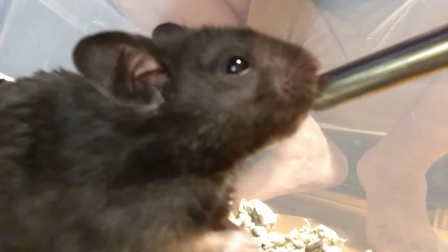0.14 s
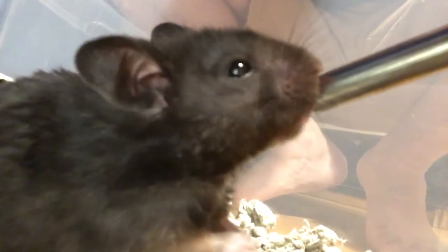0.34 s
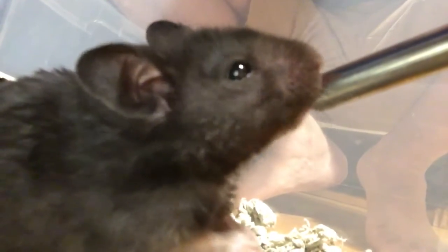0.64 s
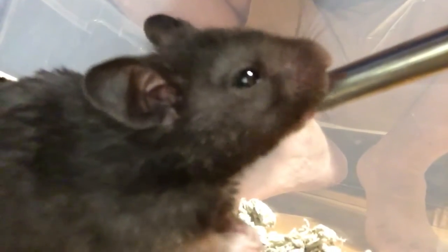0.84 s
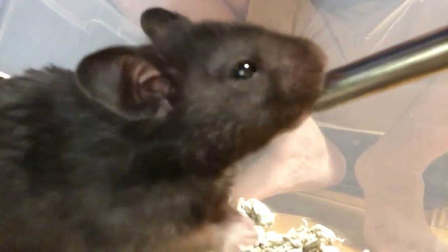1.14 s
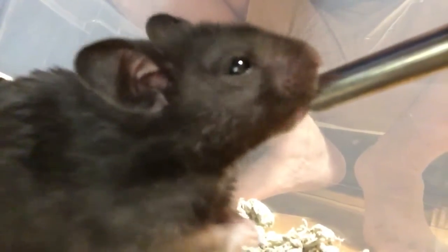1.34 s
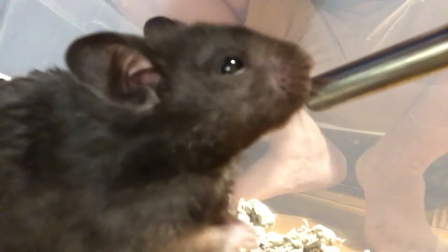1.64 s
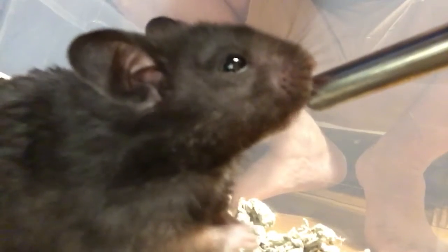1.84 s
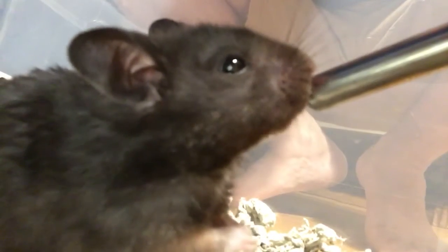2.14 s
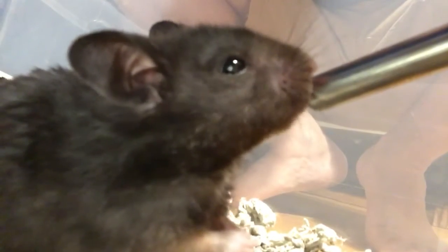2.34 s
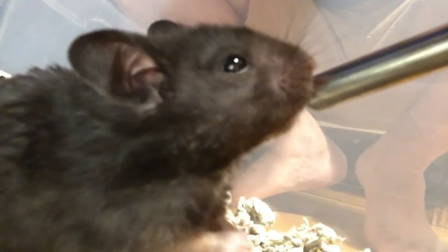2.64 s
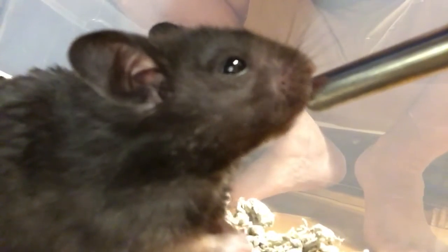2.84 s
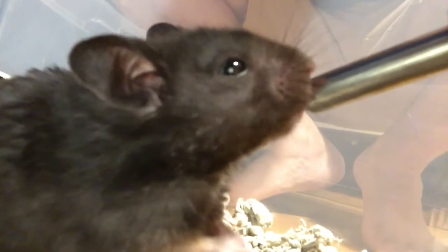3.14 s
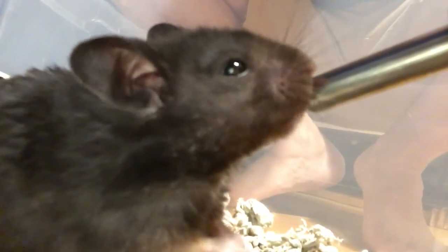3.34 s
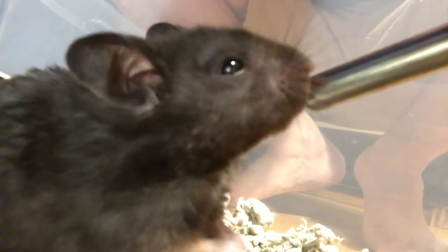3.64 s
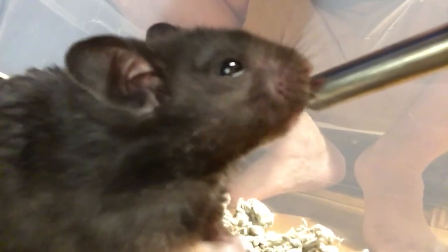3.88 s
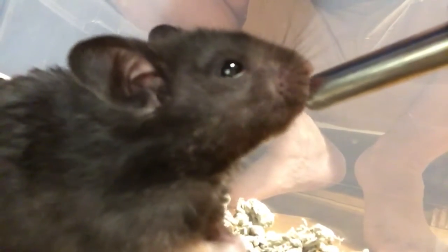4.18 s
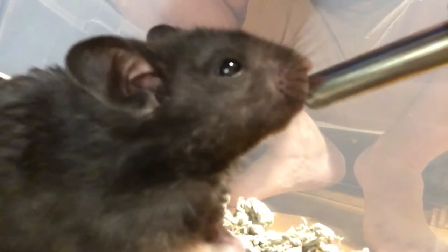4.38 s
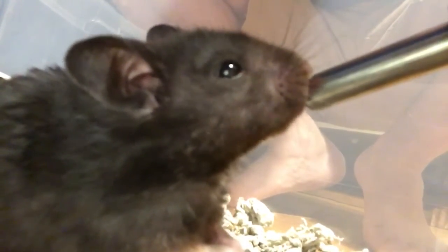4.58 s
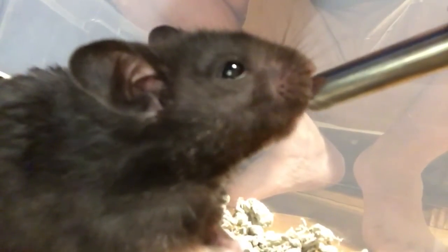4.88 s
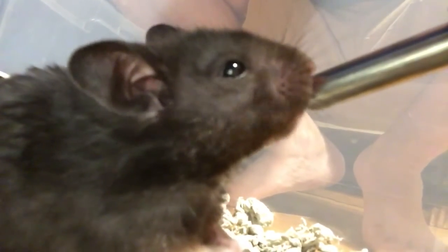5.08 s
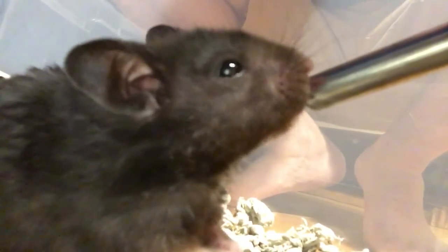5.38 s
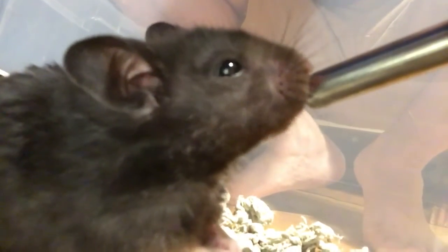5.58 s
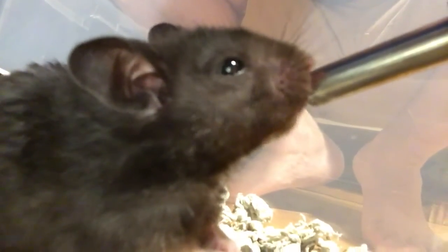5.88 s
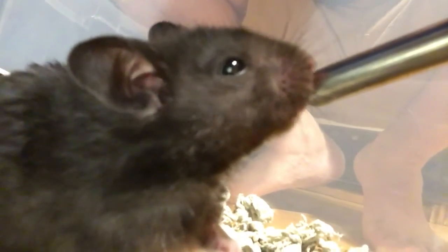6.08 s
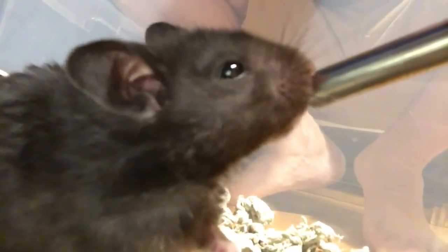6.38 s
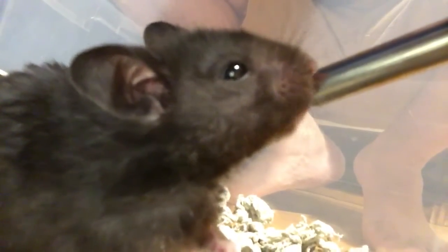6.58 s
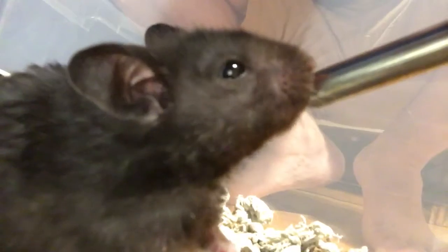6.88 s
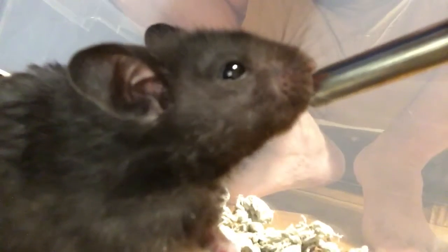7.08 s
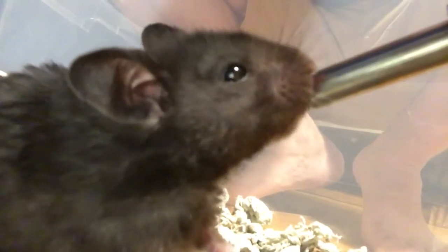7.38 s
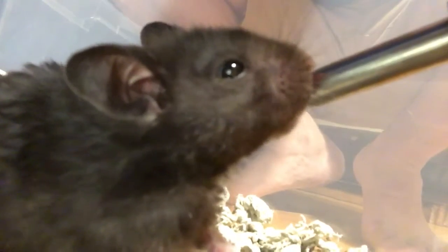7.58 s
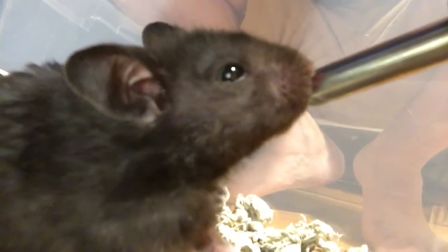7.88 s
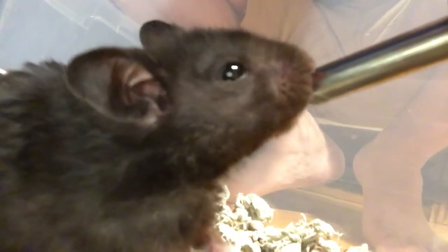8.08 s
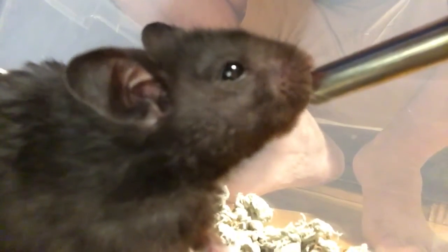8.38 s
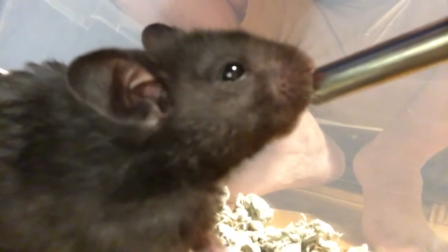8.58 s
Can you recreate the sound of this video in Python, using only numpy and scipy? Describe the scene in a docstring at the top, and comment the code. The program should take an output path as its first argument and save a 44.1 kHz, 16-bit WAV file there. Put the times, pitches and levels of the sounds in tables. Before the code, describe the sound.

Small, dry metallic clicks come from a valve ball being licked in a drinking tube, each with a short gritty rattle. Wet tongue and jaw clicks fill in between. Hollow plastic knocks jump out now and then, loudest near the start, the middle and late on. The sound is intimate, in a small plastic enclosure, with a quiet indoor hum and almost inaudible ticking behind.

```python
"""Small rodent drinking from a bottle spout

A small rodent drinks from the steel spout of a water bottle in a plastic cage, close to one microphone.
About five licks a second rattle the valve ball: decaying steel modes, noisy chatter and a gritty slide.
Hollow knocks and light taps run through resonant plastic, with their treble arriving first.
Filtered noise makes the moist tongue, rubbing fur, shuffling paws and room murmur; sines make the bubbles.
Tongue and jaw click softly, teeth tick on the rim, and a very faint ticking lies behind."""
import sys
import numpy as np
from scipy import signal
from scipy.fft import rfft, irfft
from scipy.io import wavfile
from scipy.ndimage import uniform_filter1d

SR = 44100
rng = np.random.default_rng(int(sys.argv[2]) if len(sys.argv) > 2 else 0)


def waveform_to_disk(signal):
    """Save audio, clipped to [-1, 1], as 16-bit WAV at the path in sys.argv[1]."""
    frames = np.transpose(np.atleast_2d(signal))
    scaled = np.clip(frames, -1, 1) * 32767
    samples = np.round(scaled).astype(np.int16)
    wavfile.write(sys.argv[1], SR, samples)


N = 384552
SIZE = 4096  # length of one event [samples]
AGE = np.arange(SIZE) / SR  # time since the start of an event [s]
HZ = np.fft.rfftfreq(SIZE, 1 / SR) + 1  # event spectrum, shifted 1 Hz to stay clear of zero

# modes of the steel spout, before scatter: (frequency [Hz], level [dB], t60 [s])
SPOUT_MODES = [(1101, -9, 0.031), (1442, -17, 0.068), (1806, -24, 0.062), (2400, -6.5, 0.035),
               (2486, -3, 0.026), (2730, -8, 0.035), (2811, -3.5, 0.044), (3320, -23, 0.037),
               (3570, -25.5, 0.047), (3820, -15.5, 0.025), (5220, -13, 0.044), (5350, -10, 0.044),
               (5472, -2, 0.02), (5750, -14.5, 0.044), (6440, -19, 0.039), (7010, -10, 0.025),
               (7580, -13.5, 0.031), (8210, -6.5, 0.015), (8530, 2.5, 0.0056), (8950, -3.5, 0.013),
               (9650, -4, 0.014), (10100, -13.5, 0.026), (11300, -15, 0.013), (11950, -6.5, 0.0042),
               (11700, -45, 0.011), (14000, -27, .01), (14900, -5, 0.0055)]
# resonances of the plastic: (frequency [Hz], half-width at -6 dB [Hz], level [dB])
PLASTIC_MODES = [(194, 84, -14), (387, 50, -19.5), (566.4, 67, 2.5), (736, 115, -0.5), (1030, 150, -8.5),
                 (1397, 103, -11.5), (1920, 285, -18.5), (2400, 217, -21), (2730, 120, -17),
                 (3480, 270, -25), (4260, 390, -32.5), (5700, 400, -44), (7130, 620, -40.5)]
# how busy the mouth is, before the trim of each layer: (time [s], level [dB])
MOUTH_ACTIVITY = [(0.0, -64), (0.24, -69), (0.77, -60), (0.97, -66.5), (1.48, -71.5), (2.38, -67),
                  (2.69, -59), (3.06, -66), (3.74, -61.5), (4.27, -68), (4.78, -60), (5.34, -65),
                  (6.61, -66.5), (7.02, -58.5), (7.72, -69), (8.13, -63.5), (8.4, -69), (8.72, -62)]
# each lick lifts the valve ball and lets it drop back, levels before the trim of each layer:
# (time [s], lift level [dB], time aloft [s], drop level [dB], extra ring of the low tube modes [dB])
LICK_EVENTS = [(0.1833, -45, 0.016, -54, 8.5), (0.3756, -40.5, 0.036, -47.5, 6),
               (0.575, -45.5, 0.012, -51.5, 7.5), (0.636, -53, 0.012, -64, 7.5),
               (0.7378, -52, .032, -51.5, 9.5), (0.7826, -50, 0.019, -41, 4.5),
               (0.829, -54.5, .04, -51, 4.5), (0.9164, -42.5, .0053, -42, 1),
               (0.9381, -40, 0.0044, -50, 5.5), (1.036, -54, 0.0045, -40.5, -9),
               (1.089, -55.5, 0.01, -56.5, 7), (1.3262, -51.5, 0.045, -58.5, 8), (1.5533, -66, .01, -76, 4),
               (1.723, -65, 0.014, -55.5, 7.5), (2.088, -53.5, .0085, -49.5, 6.5),
               (2.2743, -65.5, .01, -72, 3), (2.4514, -58.5, 0.01, -50, 8), (2.8039, -57.5, .01, -58.5, 3),
               (3.0164, -55, 0.011, -69, 5.5), (3.1926, -62, 0.0083, -55, 8.5),
               (3.366, -53.5, 0.0098, -51.5, 6.5), (3.549, -65, .01, -72, 3), (3.94, -59, 0.0091, -77, 12),
               (4.1126, -53, 0.02, -51, 5), (4.3141, -53, 0.0076, -60, 6.5), (4.492, -62.5, .01, -70, 5),
               (4.8897, -52, 0.026, -55, 7), (5.0785, -53, 0.016, -50, 5), (5.2672, -61, 0.008, -50, 9),
               (5.4507, -58, 0.0047, -58.5, 6), (5.8544, -55, 0.035, -47, 6.5),
               (6.0497, -53.5, .0076, -48.5, 3.5), (6.2388, -57.5, 0.0087, -78, 7.5),
               (6.448, -55.5, 0.019, -54, 6.5), (6.627, -52.5, 0.016, -53, 6), (6.69, -44.5, 0.044, -59, 7),
               (6.8363, -53, 0.014, -50.5, 6.5), (7.0256, -50.5, 0.0095, -53.5, 3.5),
               (7.0594, -52, .0057, -50, 8.5), (7.211, -56, 0.014, -58.5, 0),
               (7.2704, -48, 0.041, -60, 1.5), (7.4055, -61, 0.033, -48, 6),
               (7.7964, -66, 0.023, -46.5, 7.5), (7.9817, -57.5, .0169, -51.5, 7.5),
               (8.17, -55.5, 0.023, -44.5, 7.5), (8.24, -54, .01, -74, 6), (8.3585, -66.5, .01, -73, 8)]


def undb(db):
    """Decibels to gain."""
    return np.exp(np.asarray(db) * (np.log(10) / 20))


def unit(x):
    """Scale to an rms of one."""
    return x / np.sqrt(np.mean(x ** 2))


def blow(x):
    """Scale a hit so that its energy equals an rms of one over 5 ms."""
    return x / np.sqrt(np.sum(x ** 2) / (.005 * SR))


def fade(t60):
    """Exponential decay over one event, falling 60 dB in t60 seconds."""
    return undb(-60 * AGE / t60)


def colour(points, hz):
    """Gain of a (frequency [Hz], level [dB]) spectrum, interpolated over log frequency."""
    f, db = np.transpose(points)
    return undb(np.interp(np.log(hz + 1), np.log(f), db))


def shaped(x, points):
    """Give a full-length signal a spectrum."""
    return irfft(rfft(x) * colour(points, np.fft.rfftfreq(N, 1 / SR)), N)


def resonances(modes, hz):
    """Gain of overlapping (frequency [Hz], half-width [Hz], level [dB]) resonances."""
    power = 0
    for centre, width_hz, db in modes:
        power = power + undb(db) ** 2 / (1 + ((hz - centre) / width_hz) ** 2) ** 2
    return np.sqrt(power)


def causal(gain):
    """Minimum phase: the quickest response that has this gain, from the folded cepstrum."""
    cepstrum = irfft(np.log(gain))
    cepstrum[1:SIZE // 2] *= 2
    cepstrum[SIZE // 2 + 1:] = 0
    return np.exp(rfft(cepstrum))


def curve(rows):
    """A (time [s], level [dB]) table as a gain for each sample, -120 dB outside."""
    s, db = np.transpose(rows)
    return undb(np.interp(np.arange(N) / SR, s, db, left=-120, right=-120))


def swells(rows, attack_s, t60):
    """Sum of (time [s], length [s], level [dB]) swells that rise before their time, hold and die away."""
    t = np.arange(N) / SR
    gain = np.zeros(N)
    for s, length, db in rows:
        rise = np.clip((t - s) / attack_s + 1, 0, 1) ** 2
        decay = np.exp(-np.log(1000) * np.maximum(t - s - length, 0) / t60)
        gain += undb(db) * rise * decay
    return gain


def walk(rate):
    """Smoothed random drift with an rms of one and about rate fresh values a second."""
    k = int(SR / rate)
    held = np.repeat(rng.standard_normal(N // k + 1), k)
    return unit(uniform_filter1d(held, k)[:N])


def grit(spread_db):
    """Dense tiny contacts of very uneven size: noise with a fast random level."""
    return unit(rng.standard_normal(N) * undb(spread_db * walk(900)))


def add(track, s, x):
    """Mix a sound in at a time."""
    i = max(int(s * SR), 0)
    track[i:i + len(x)] += x[:max(N - i, 0)]


def ring(modes, scatter_db, detune):
    """Decaying sine modes; every contact point weights and tunes them a little differently."""
    hz, db, t60 = np.transpose(modes)[:, :, None]
    size, pitch, sign = rng.standard_normal((3, len(modes), 1))
    gain = np.sign(sign) * undb(db + scatter_db * size)
    tone = np.sin(2 * np.pi * hz * (1 + detune * pitch) * AGE)
    return np.sum(gain * fade(t60) * tone, axis=0)


def reflect(x, wet_db, t60, dull_hz, gap_s):
    """Add dense, dulled reflections: low-passed decaying noise that starts after a short gap."""
    tail = rng.standard_normal(SIZE) * fade(t60) * (AGE > gap_s)
    tail = irfft(rfft(tail / np.sqrt(np.sum(tail ** 2))) / (1 + 1j * HZ / dull_hz))
    return x + undb(wet_db) * signal.fftconvolve(x, tail)[:N]


def room(level_db=-54.5):
    """A nearly steady murmur of noise that rings the air in the cage."""
    # the room as heard inside the cage: (frequency [Hz], level [dB])
    room_colour = [(22, -33), (50, -2.5), (90, -8.5), (130, -6), (290, -14.5), (1100, -26), (1800, -28),
                   (3000, -35), (4000, -34), (4850, -39), (5400, -34.5), (7000, -37.5), (8200, -43),
                   (15500, -50)]
    # room and cage-air resonances: (frequency [Hz], half-width at -6 dB [Hz], level [dB])
    air_modes = [(56.8, 9.7, 3.5), (125, 31, -8.5), (247, 16, -14), (381, 39.4, -5.5), (528, 25, -2.5),
                 (587, 32, -3), (706, 98, -10), (2380, 105, -24.5), (2855, 103, -23.5)]
    hz = np.fft.rfftfreq(N, 1 / SR)
    gain = np.hypot(colour(room_colour, hz), resonances(air_modes, hz))
    murmur = unit(irfft(rfft(rng.standard_normal(N)) * gain, N))
    return murmur * undb(level_db + 0.75 * walk(6.6))


def ticking(level_db=-74, rate_hz=20.2, uneven_s=.004, t60=0.0084):
    """Very faint, nearly regular ticks of treble noise in the background."""
    # colour of the ticks: (frequency [Hz], level [dB])
    tick_colour = [(1500, -12), (3000, 6.5), (4800, -18), (6600, -3.5), (7200, -10), (8500, -20)]
    out = np.zeros(N)
    for s in np.arange(0, N / SR, 1 / rate_hz):
        late, size = rng.standard_normal(2)
        strength = undb(4 * np.tanh(size))
        add(out, s + uneven_s * late, strength * rng.standard_normal(SIZE) * fade(t60))
    return unit(shaped(out, tick_colour)) * undb(level_db)


def shuffle():
    """Soft, uneven thumps of paws on the bedding: low noise with a fluttering level."""
    # colour of the bedding: (frequency [Hz], level [dB])
    bedding_colour = [(25, -34), (55, 5.5), (100, 0.5), (200, -4.5), (350, -11), (700, -19), (1500, -20.5),
                      (4000, -39), (12000, -74)]
    # the animal shifts its weight: (time [s], length [s], level [dB])
    step_rows = [(.37, .04, -49.5), (.65, 0.025, -53.5), (.765, 0.038, -45), (.9, 0.056, -42.5),
                 (1.02, 0.19, -49.5), (1.31, 0.052, -48), (5.865, 0.044, -48), (6.185, 0.032, -46.5)]
    paws = unit(shaped(rng.standard_normal(N) * undb(2 * walk(90)), bedding_colour))
    return paws * swells(step_rows, attack_s=0.024, t60=0.23)


def tongue(level_db=-2.0):
    """A fine, moist crackle of uneven noise while the mouth works."""
    # colour of the wet tongue: (frequency [Hz], level [dB])
    wet_colour = [(200, -47), (700, 10.5), (1300, 8.5), (1900, -4), (3200, -0.5), (4500, -20), (6000, -44),
                  (12000, -40)]
    crackle = grit(spread_db=6) * undb(4 * walk(70))
    return unit(shaped(crackle, wet_colour)) * curve(MOUTH_ACTIVITY) * undb(level_db)


def knock(bright_db, pitch, soft_hz, lag_s=0.001198, bright_hz=1400, echo_s=0.00466, echo_db=-22):
    """A bending wave in thin plastic: the treble arrives first, the lows follow, the far edge echoes it."""
    body = resonances(PLASTIC_MODES, HZ / pitch)
    treble = undb(bright_db * (1 - 1 / (1 + (HZ / bright_hz) ** 4)))
    contact = treble / (1 + (HZ / soft_hz) ** 6)
    # travel time falls with the root of frequency; lag_s holds at 1 kHz
    travel = np.exp(-4j * np.pi * lag_s * np.sqrt(1000 * HZ))
    echo = 1 + undb(echo_db) * np.exp(-2j * np.pi * HZ * echo_s) / (1 + (HZ / 2500) ** 2)
    scale = np.sqrt(np.sum(irfft(body) ** 2) / (.005 * SR))
    return -irfft(causal(body * contact) * travel * echo) / scale


def smacks(count=300, level_db=6, spread_db=4, soft_hz=2800):
    """Many faint wet clicks of tongue and jaw at random times, coloured by the plastic of the cage."""
    out = np.zeros(N)
    for when, size, bright, pitch in rng.uniform(-1, 1, (count, 4)):
        click = knock(2 + 5 * bright, np.exp(0.059 + .35 * pitch), soft_hz)
        add(out, (when + 1) / 2 * N / SR, undb(spread_db * size) * click)
    clicks = out * curve(MOUTH_ACTIVITY) * undb(level_db)
    return reflect(clicks, wet_db=-2.5, t60=0.016, dull_hz=5030, gap_s=0.0028)


def nudges(count=44, level_db=14, spread_db=4, bright_db=1, soft_hz=3500):
    """About once a lick the bottle taps lightly in its holder, harder when the mouth is busy."""
    out = np.zeros(N)
    for k, (when, size, bright, pitch) in enumerate(rng.uniform(-1, 1, (count, 4))):
        tap = knock(bright_db + 9 * bright, np.exp(.12 * pitch), soft_hz)
        # one tap falls at random in each of the equal slots
        add(out, (k + (when + 1) / 2) / count * N / SR, undb(spread_db * size) * tap)
    taps = out * curve(MOUTH_ACTIVITY) * undb(level_db)
    return reflect(taps, wet_db=-3, t60=0.035, dull_hz=5000, gap_s=.003)


def knocks(lead_s=.0006, soft_hz=8800, softening=0.28, stutter_db=-44):
    """Hollow plastic knocks as the bottle is nudged and settles."""
    # knocks of bottle and cage wall: (time [s], level [dB], treble lift [dB], pitch relative to 555 Hz [Hz])
    knock_rows = [(0.1183, -43, -2, 570), (0.4747, -30, -4.5, 518), (0.5037, -44.5, 9, 560),
                  (0.5272, -49, 18, 646), (0.8473, -17.5, -1, 558), (1.1831, -20, 0, 553),
                  (1.9198, -38, 3, 537), (2.587, -19.5, 3.5, 551), (2.743, -47, 11, 610),
                  (2.7786, -26, 1, 550), (2.844, -25, 1.5, 563), (2.8858, -38.5, 1.5, 600),
                  (2.9366, -39, -11, 537), (3.2315, -48.5, 10, 610), (3.5315, -46.5, 10, 533),
                  (3.6941, -41.5, 3, 620), (3.7751, -41, -1, 545), (3.9272, -44, 9, 483),
                  (3.9487, -41, 0, 493), (4.296, -47, 6, 517), (4.4461, -42.5, -18, 517),
                  (4.5452, -45.5, 3, 604), (4.6607, -42, -2, 516), (4.809, -20.5, -3.5, 559),
                  (4.8576, -44, 3, 570), (4.9874, -42.5, -16, 593), (5.1296, -39, 2, 576),
                  (5.1406, -19.5, -5, 555), (5.25, -47.5, 6, 640), (5.6371, -42, -7, 570),
                  (5.8319, -40.5, -9, 560), (5.8723, -39, -7, 535), (5.9099, -37.5, -1, 555),
                  (6.188, -36, -3, 480), (6.2072, -39, 3, 560), (6.604, -44, 2, 556),
                  (7.0845, -18.5, -5, 548), (7.1447, -35.5, 2.5, 610), (7.676, -47, 6, 640),
                  (7.9494, -43, -17, 497), (8.2774, -47.5, 6, 608)]
    out = np.zeros(N)
    loudest = max(row[1] for row in knock_rows)
    for (s, db, bright_db, hz), wait in zip(knock_rows, rng.random(len(knock_rows))):
        # gentle contacts last longer and so lose their top
        top_hz = soft_hz * undb(softening * (db - loudest))
        hit = knock(bright_db, hz / 555, top_hz)
        add(out, s - lead_s, undb(db) * hit)
        # a faint second touch follows within a few milliseconds
        add(out, s + 0.001985 + 0.00598 * wait, undb(min(db - 8.5, stutter_db)) * hit)
    return reflect(out, wet_db=-17.5, t60=0.082, dull_hz=5000, gap_s=0.0031)


def rub(plastic_db=-1, crackle_db=-12):
    """Fur and teeth drag over the tube: gritty noise stirs both the steel and the bottle."""
    # colour of the soft rubbing force: (frequency [Hz], level [dB])
    fur_colour = [(200, -21), (2000, 11), (6000, -1.5), (9000, -8), (15000, -12)]
    # the snout rubs along the spout: (time [s], length [s], level [dB])
    rub_rows = [(.775, 0.036, -45), (.915, 0.03, -44), (1.035, 0.014, -63)]
    steel = blow(ring(SPOUT_MODES, scatter_db=8, detune=0.0028))
    plastic = blow(irfft(causal(resonances(PLASTIC_MODES, HZ)) * 1j * HZ))
    body = steel + undb(plastic_db) * plastic
    force = shaped(grit(spread_db=10.5), fur_colour)
    drag = unit(signal.fftconvolve(force, body)[:N])
    drag = drag + undb(crackle_db) * grit(spread_db=18)
    return drag * swells(rub_rows, attack_s=0.0078, t60=0.24)


def teeth(scrape_db=-2, scrape_t60=0.015):
    """Hard, thin ticks on the rim: short high modes and a scrape of noise."""
    # teeth touch the rim of the tube: (time [s], level [dB])
    tooth_rows = [(0.774, -42), (0.782, -45), (0.8877, -44), (0.8926, -58), (1.2771, -59)]
    # modes of the rim, before scatter: (frequency [Hz], level [dB], t60 [s])
    rim_modes = [(4070, 9, 0.012), (4180, 8, 0.0098), (4570, 3, 0.0085), (6440, 3, 0.008), (9700, -9, .008),
                 (11300, 0, 0.0074), (13100, -11, .008), (14700, -16, .008)]
    out = np.zeros(N)
    for s, db in tooth_rows:
        scrape = blow(rng.standard_normal(SIZE) * fade(scrape_t60))
        rim = blow(ring(rim_modes, scatter_db=2.5, detune=.02))
        add(out, s, undb(db) * (rim + undb(scrape_db) * scrape))
    return reflect(out, wet_db=-6, t60=.035, dull_hz=6000, gap_s=0.0022)


def bubbles(t60=0.005, glide=0.13):
    """Small air bubbles in the spout ring briefly, rising in pitch as they reach the surface."""
    # bubbles: (time [s], level [dB], starting pitch [Hz])
    bubble_rows = [(1.3183, -39.5, 2300), (3.6935, -47.5, 3270), (4.689, -60, 3280), (7.7335, -56.5, 3360),
                   (8.6958, -57.5, 3170)]
    out = np.zeros(N)
    for s, db, start_hz in bubble_rows:
        hz = start_hz * (1 + glide * np.minimum(AGE / t60, 1))
        phase = 2 * np.pi * np.cumsum(hz) / SR
        add(out, s, undb(db) * blow(np.sin(phase) * fade(t60)))
    return reflect(out, wet_db=-9, t60=0.024, dull_hz=6000, gap_s=0.002)


def slide(slide_db=-14, plastic_db=-3, soft_hz=7000):
    """The tongue drags the ball round its seat: a gritty ring swells, following each lick's harder strike."""
    rolls = []
    for s, lift_db, aloft_s, drop_db, ring_db in LICK_EVENTS:
        rolls.append((s, aloft_s, max(lift_db, drop_db) + slide_db))
    steel = rfft(ring(SPOUT_MODES, scatter_db=3, detune=.002))
    steel = blow(irfft(steel / (1 + (HZ / soft_hz) ** 4)))
    tilt = (1j * HZ) ** 2 / (1 + 1j * HZ / 3000) ** 2  # thins the lows
    plastic = blow(irfft(causal(resonances(PLASTIC_MODES, HZ)) * tilt))
    drag = unit(signal.fftconvolve(grit(spread_db=8), steel + undb(plastic_db) * plastic)[:N])
    return drag * swells(rolls, attack_s=0.015, t60=0.07)


def strikes(bounce_s=.006, bounce_db=-11.5):
    """Lift and drop of each lick, each with one rebound: (time [s], level [dB], ring [dB])."""
    out = []
    all_waits = .5 + rng.random((len(LICK_EVENTS), 2))
    for (s, lift_db, aloft_s, drop_db, ring_db), waits in zip(LICK_EVENTS, all_waits):
        for when, db, wait in zip((s, s + aloft_s), (lift_db, drop_db), waits):
            out.append((when, db, ring_db))
            out.append((when + bounce_s * wait, db + bounce_db, ring_db))
    return out


def contacts(lead_s, count=4, graze_db=-11, within_s=0.02, soft_hz=7000, chatter_db=-9, chatter_t60=0.01):
    """Force on the tube, as a spectrum: one strike, soft wet grazes around it, and a dying chatter."""
    when, size = rng.random((2, count, 1))
    delays = np.exp(-2j * np.pi * HZ * within_s * when ** 2)
    grazes = np.sum(undb(graze_db - 10 * size) * delays, axis=0) / (1 + 1j * HZ / soft_hz) ** 2
    chatter = rng.standard_normal(SIZE) * fade(chatter_t60)
    strike = 1 + undb(chatter_db) * rfft(chatter / np.linalg.norm(chatter))
    return grazes + strike * np.exp(-2j * np.pi * HZ * lead_s)


def bottle(level_db=-14, swell_s=0.004, bright_hz=1500):
    """The bottle takes up a strike on its spout a few milliseconds late: swelling noise through plastic."""
    shake = rng.standard_normal(SIZE) * fade(.09) * (1 - np.exp(-(AGE / swell_s) ** 2))
    plastic = causal(resonances(PLASTIC_MODES, HZ)) * (1 + 1j * HZ / bright_hz)
    return undb(level_db) * blow(irfft(rfft(shake) * plastic))


def ball(click_db=-10, click_t60=0.019, ring_hz=4200, level_db=2.5, soft_hz=17000, softening=0.31):
    """The steel ball hits the tube, chatters briefly in its seat and shakes the bottle."""
    out = np.zeros(N)
    lead_s = .004  # room for grazes ahead of the strike
    hits = strikes()
    loudest = max(db for s, db, ring_db in hits)
    for s, db, ring_db in hits:
        modes = blow(ring(SPOUT_MODES, scatter_db=3, detune=.007))
        click = blow(rng.standard_normal(SIZE) * fade(click_t60))
        tube = modes + undb(click_db) * click
        # a cushioning tongue leaves more of the low modes, and gentle strikes lose their top
        top_hz = soft_hz * undb(softening * (db - loudest))
        low_ring = undb(ring_db / (1 + (HZ / ring_hz) ** 4))
        cushion = causal(low_ring / np.sqrt(1 + (HZ / top_hz) ** 8))
        gain = undb(db + level_db)
        add(out, s - lead_s, gain * irfft(rfft(tube) * cushion * contacts(lead_s)))
        add(out, s, gain * bottle())
    return reflect(out, wet_db=-10.5, t60=0.07, dull_hz=6000, gap_s=0.00094)


def scene():
    """All sources at one microphone."""
    background = room() + ticking()
    animal = shuffle() + tongue() + smacks()
    plastic = nudges() + knocks()
    spout = rub() + teeth() + bubbles() + slide() + ball()
    return (background + animal + plastic + spout)[None]


def record(dry):
    """A steep elliptic low-pass cuts the top above 15.9 kHz."""
    return signal.sosfilt(signal.ellip(8, .2, 70, 15900, fs=SR, output="sos"), dry)


dry = scene()
out = record(dry)
waveform_to_disk(out)
```